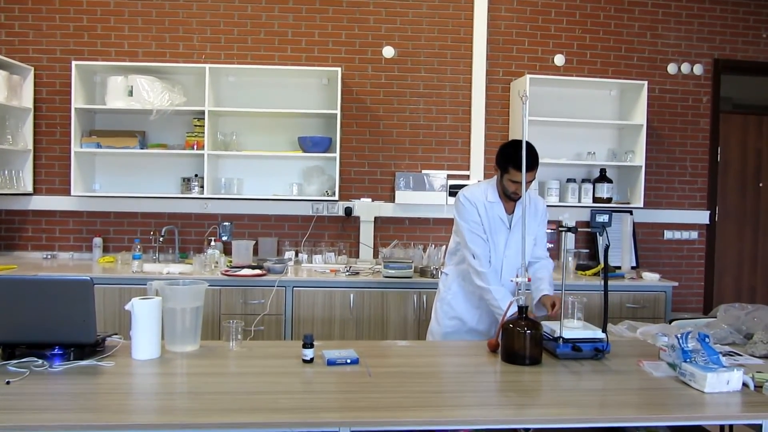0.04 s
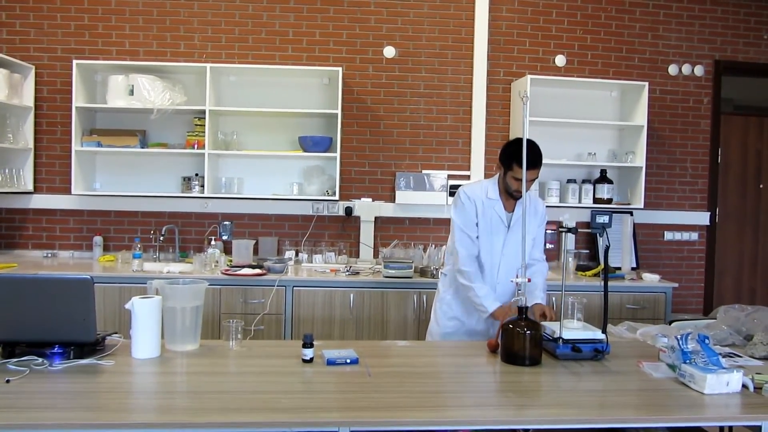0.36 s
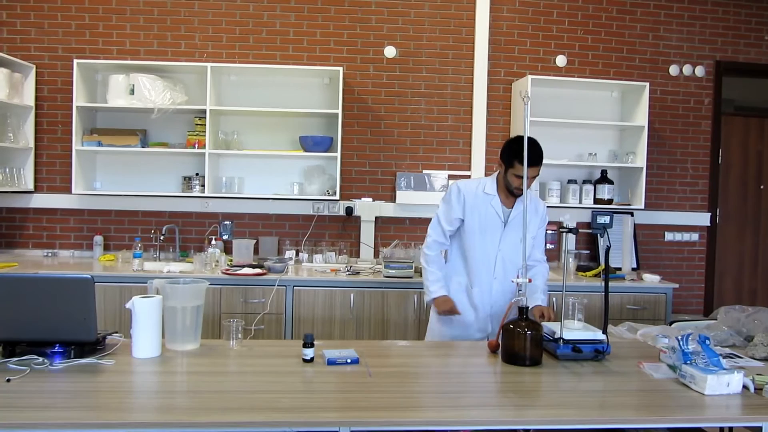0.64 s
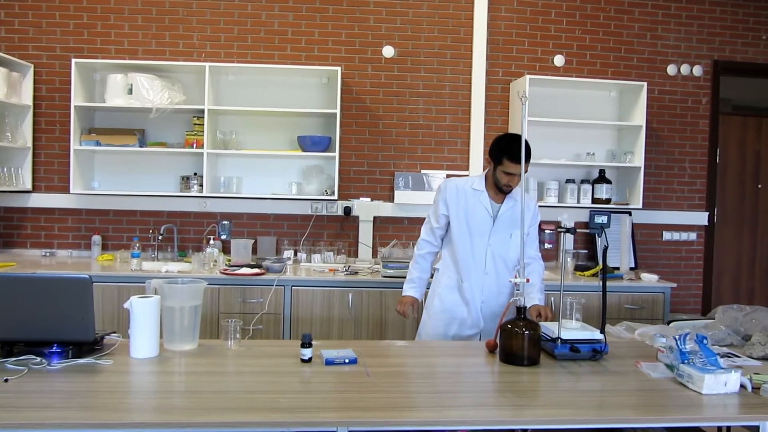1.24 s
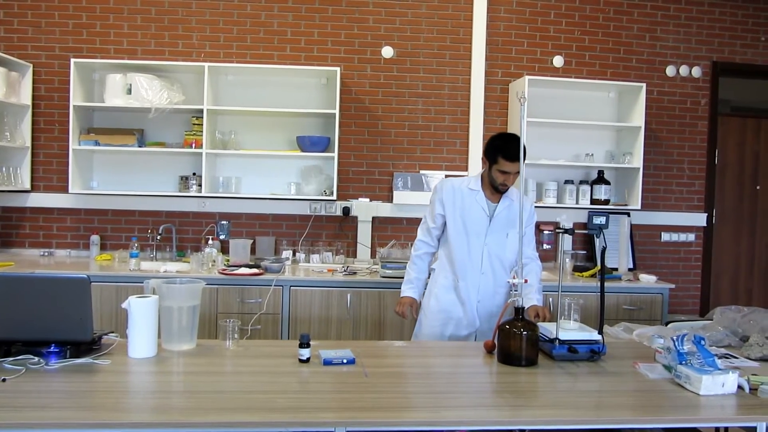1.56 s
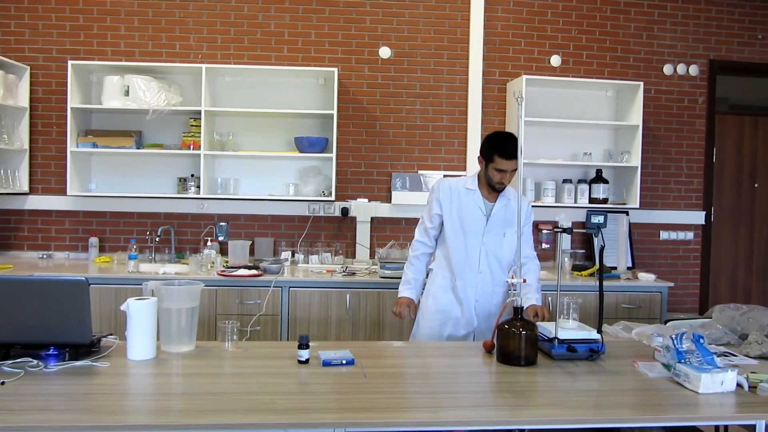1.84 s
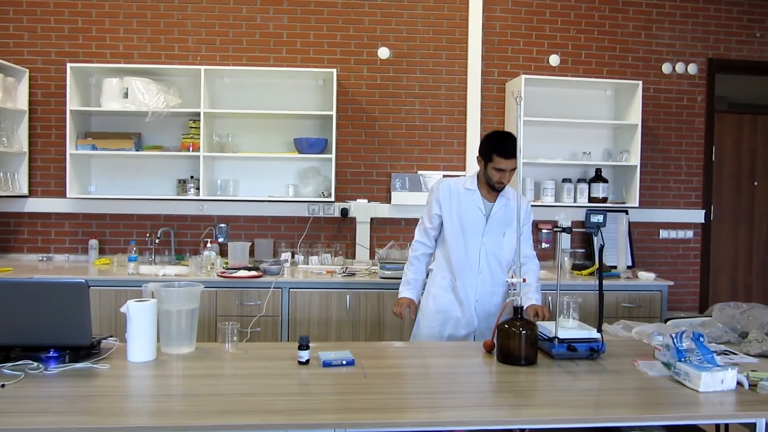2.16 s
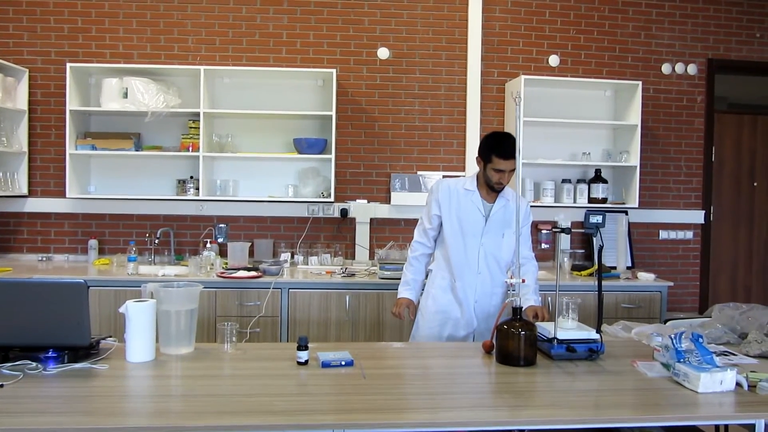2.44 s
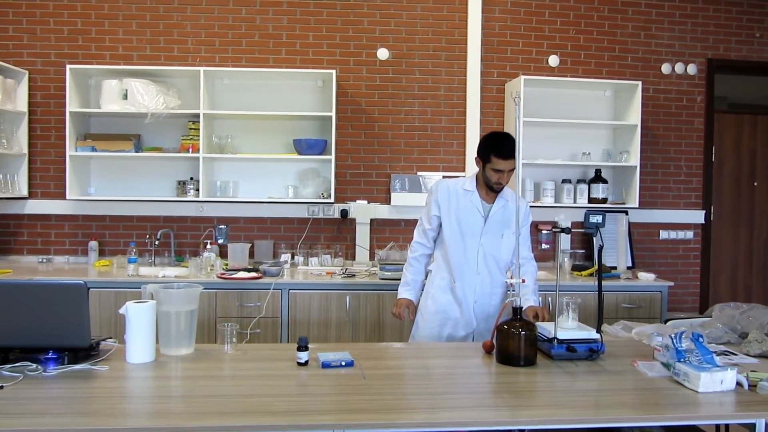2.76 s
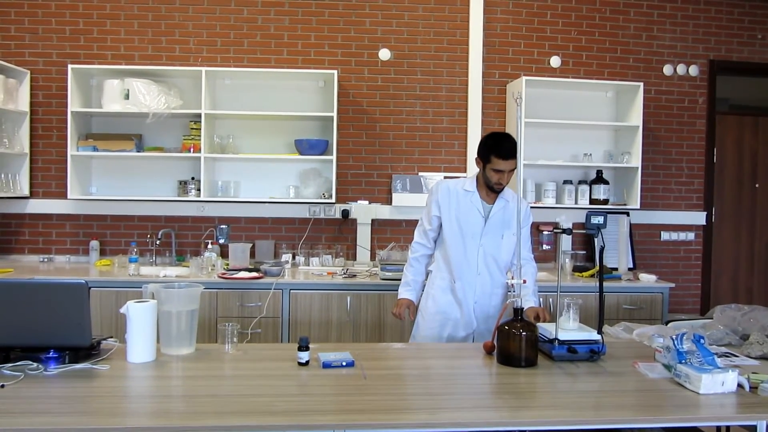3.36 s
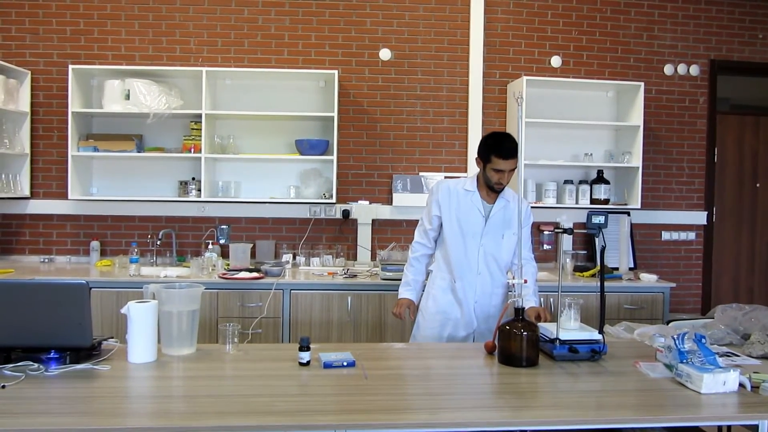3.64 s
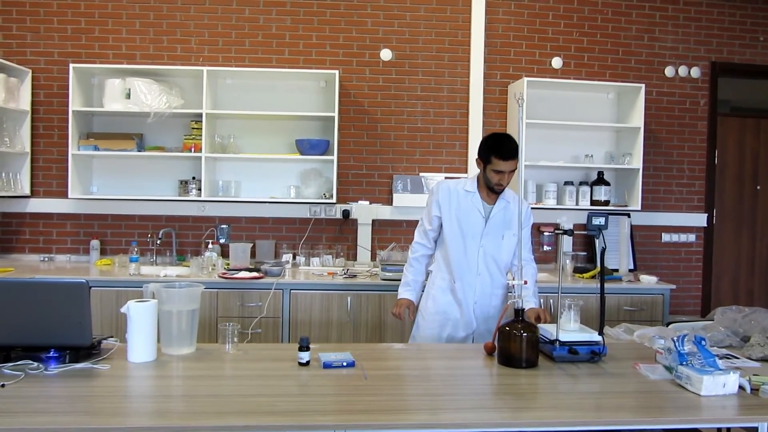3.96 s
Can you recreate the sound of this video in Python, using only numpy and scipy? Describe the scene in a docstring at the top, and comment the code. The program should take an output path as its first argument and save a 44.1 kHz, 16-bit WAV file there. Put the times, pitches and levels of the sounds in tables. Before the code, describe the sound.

A lab stirrer's bar speeds up, rattling and clinking unevenly against glass as its motor hums.

```python
"""Magnetic stirrer in a laboratory

The motor hums while the bar speeds up and rattles in a glass vessel. Uneven taps ring the vessel and
its plate; a bright resonance climbs and takes over as the stirring grows. Now and then the bar kicks
or scrapes against the glass. A hard-walled room answers over faint ventilation hiss."""
import sys
import numpy as np
from scipy import signal
from scipy.fft import rfft, irfft, next_fast_len
from scipy.io import wavfile
from scipy.ndimage import uniform_filter1d, map_coordinates

SR = 44100
rng = np.random.default_rng(int(sys.argv[2]) if len(sys.argv) > 2 else 0)


def unload_audio(sound):
    """Save the sound as a 16-bit wav file, at the path given as the first command line argument."""
    columns = np.transpose(np.atleast_2d(sound))
    # keep every value between -1 and 1, then stretch to whole-number steps
    steps = np.round(np.clip(columns, -1, 1) * 32767)
    wavfile.write(sys.argv[1], SR, steps.astype(np.int16))


N = 4 * SR
SKIRT_HZ, PING_RISE_S = 850, .00046

# spectrum of sharp contact with the glass: f/Hz, level/dB
GLASS_SPECTRUM = [(40, -47), (100, -36.5), (900, -8.5), (1500, -2), (2400, -1.5), (2900, 2.5), (3300, 2.5),
                  (3750, -5), (4100, -13), (4800, -10), (5250, -5), (5650, -14.5), (6200, -11.5),
                  (7000, -18), (7800, -26), (8800, -28.5), (10000, -41), (12000, -64.5), (14000, -51.5),
                  (16000, -64.5)]


def amp(db):
    """Decibels to gain."""
    return 10 ** (np.asarray(db) / 20)


def unit(x):
    """Scale to rms 1."""
    return x / np.sqrt(np.mean(x ** 2) + 1e-20)


def along(points, hz):
    """Interpolate (f/Hz, value) points on a log axis."""
    f, v = np.transpose(points)
    return np.interp(np.log(hz + 1), np.log(f + 1), v)


def curves(rows):
    """One value per sample for each column after t/s."""
    s, *cols = np.transpose(rows)
    return [np.interp(np.arange(N) / SR, s, c) for c in cols]


def wobble(knots_per_s):
    """Smooth random curve."""
    return map_coordinates(rng.standard_normal(400), [np.arange(N) * knots_per_s / SR], mode='mirror')


def envelope(t, rise_s, t60_s):
    """Exponential rise and decay."""
    return (1 - np.exp(-t / rise_s)) * amp(-60 * t / t60_s)


def add(track, start_s, sound):
    """Mix a sound into the track."""
    part = track[round(start_s * SR):][:len(sound)]
    part += sound[:len(part)]


def filtered(x, response, pad=4096):
    """Apply a frequency response; ends mirrored and faded."""
    edge = np.hanning(2 * pad)
    length = x.shape[-1]
    x = np.pad(x, [(0, 0)] * (x.ndim - 1) + [(pad, pad)], mode='reflect')
    x = x * np.concatenate([edge[:pad], np.ones(length), edge[pad:]])
    m = next_fast_len(length + 4 * pad)
    return irfft(rfft(x, m) * response(np.fft.rfftfreq(m, 1 / SR)), m)[..., pad:pad + length]


def struck(force, spectrum, size=8192):
    """Ring a minimum-phase body of given spectrum and unit energy."""
    cepstrum = irfft(np.log(amp(along(spectrum, np.fft.rfftfreq(size, 1 / SR)))))
    cepstrum[1:size // 2] *= 2
    cepstrum[size // 2 + 1:] = 0
    impulse = irfft(np.exp(rfft(cepstrum)))
    return signal.fftconvolve(force, impulse / np.linalg.norm(impulse))[:N]


def resonance(force, hz, widths_hz):
    """Unit-energy resonance with a per-sample centre, one pole per width."""
    turn = np.exp(2j * np.pi * np.cumsum(hz) / SR)
    poles = np.poly(np.exp(-np.pi * np.abs(widths_hz) / SR))
    impulse = signal.lfilter([1], poles, signal.unit_impulse(SR // 10))
    return np.sqrt(2) * np.real(turn * signal.lfilter([1], poles, force / turn)) / np.linalg.norm(impulse)


def diffuse_noise(size):
    """Noise of a diffuse field, left and right."""
    # left-right likeness: f/Hz, correlation
    likeness = [(100, 0), (700, 0.2), (1500, 0.53), (2500, 0), (10000, 0)]
    angle = lambda hz: np.arccos(np.clip(along(likeness, hz), -1, 1)) / 2
    noise = rng.standard_normal((2, size))
    mid, side = filtered(noise, lambda hz: np.array([np.cos(angle(hz)), np.sin(angle(hz))]))
    return np.array([mid + side, mid - side])


def ventilation(rms_db=-46.5):
    """Steady air noise of the room."""
    # noise spectrum: f/Hz, relative level/dB
    spectrum = [(20, -11), (45, -9.5), (75, 0.5), (130, -0.5), (260, -0.5), (420, -8.5), (1000, -11.5),
                (2500, -15), (4000, -26.5), (6500, -23.5), (10000, -39), (12000, -52), (16000, -56)]
    return amp(rms_db) * unit(filtered(diffuse_noise(N), lambda hz: amp(along(spectrum, hz))))


def echoes(x, bench_db=-2, bench_t60_s=.068):
    """Quick bench reflections and the room's tail along one set of paths."""
    # room decay: f/Hz, T60/s
    room_t60 = [(150, 0.47), (800, 0.75), (2500, 0.66), (10000, 0.75)]
    hz, t, bands = signal.stft(diffuse_noise(SR // 2), SR, nperseg=256)
    decay = amp(-60 * t / along(room_t60, hz)[:, None]) + amp(bench_db - 60 * t / bench_t60_s)
    bands = bands * decay * (t > 0)
    tail = signal.istft(bands / np.linalg.norm(bands, axis=2, keepdims=True), SR, nperseg=256)[1]
    return signal.fftconvolve(x[None], tail / np.linalg.norm(tail[0]), axes=1)[:, :N]


def laboratory(x, room_db=0, right_lead_s=2e-5):
    """Stereo direct sound and echoes; paths shift as the contact point moves round the vessel."""
    # room over direct: f/Hz, level/dB
    room_ratio = [(150, -3.5), (800, 2.5), (1500, 2.5), (2400, 5), (3400, 3), (5000, 7.5), (10000, 3)]
    # right over left: f/Hz, level/dB
    balance = [(100, 2.5), (800, 0.2), (1200, 0.5), (2200, 1.5), (3400, 3), (4300, 1.5), (6200, 2.5),
               (8000, 0)]
    wander_rad = .3 * wobble(5.02)
    wet = echoes(x * np.cos(wander_rad)) + echoes(x * np.sin(wander_rad))
    wet_gain = lambda hz: amp(room_db + along(room_ratio, hz))
    sides = np.array([[-.5], [.5]])
    direct = filtered(x, lambda hz: np.exp(2j * np.pi * hz * right_lead_s * sides))
    both = direct + filtered(wet, wet_gain)
    return filtered(both, lambda hz: amp(sides * along(balance, hz)) / np.hypot(1, wet_gain(hz)))


def motor(hum_hz=100.8, waver_db=1.5):
    """Mains hum, wavering in level."""
    # hum amplitude: t/s, level/dB
    level = [(0, -47.5), (.8, -47), (2, -46), (3.3, -52.5), (4, -48.5)]
    t = np.arange(N) / SR
    phase_rad = np.array([[0], [1]])  # left, right
    return amp(curves(level)[0] + waver_db * wobble(11)) * np.sin(2 * np.pi * hum_hz * t + phase_rad)


def plate(force, gain_db=-3.5, widths_hz=(8, 150)):
    """Plate, bench and vessel hold a few lasting notes."""
    # long-ringing modes: f/Hz, level/dB
    modes = [(167, -20), (220, -24.5), (548, -21.5), (712, -9), (735, -5), (788, -18.5), (838, -5.5),
             (872, -12), (1072, -14), (1304, -12.5)]
    notes = sum(amp(gain_db + db) * resonance(force, np.full(N, hz), widths_hz) for hz, db in modes)
    return signal.sosfilt(signal.butter(2, 110, 'high', fs=SR, output='sos'), notes)


def brushes(rise_s=.0035):
    """Faint brushing: bursts of bright noise."""
    # bursts: t/s, T60/s, level/dB
    bursts = [(1.223, 0.087, -48), (1.731, 0.21, -41), (2.056, 0.06, -42), (2.793, 0.13, -35.5)]
    # brushing spectrum: f/Hz, level/dB
    spectrum = [(1500, -21), (4000, -9.5), (6500, 0), (9000, -7.5), (11000, -23), (16000, -35)]
    t, track = np.arange(SR // 2) / SR, np.zeros(N)
    for s, t60_s, db in bursts:
        add(track, s, amp(db) * envelope(t, rise_s, t60_s) * rng.standard_normal(len(t)))
    return struck(track, spectrum)


def pings(t60_s=.019):
    """Light pings of glass, one damped sine each."""
    # pings: t/s, f/Hz, level/dB
    notes = [(.772, 6370, -37), (1.033, 6290, -36), (1.108, 3450, -32), (1.505, 3060, -20),
             (1.629, 6180, -31.5)]
    t, track = np.arange(SR // 2) / SR, np.zeros(N)
    for s, hz, db in notes:
        add(track, s, amp(db) * envelope(t, PING_RISE_S, t60_s) * np.sin(2 * np.pi * hz * t))
    return track


def chinks(per_s=70, centre_hz=3058, spread_db=4.5, t60_s=.06):
    """Brief glassy notes, scattered in time, pitch and level; rms 1."""
    t, track = np.arange(SR // 20) / SR, np.zeros(N)
    for k, (late, pitch, loud) in enumerate(rng.standard_normal((700, 3))):
        hz = centre_hz * np.exp(.066 * pitch)
        note = np.sin(2 * np.pi * hz * t) * envelope(t, PING_RISE_S, t60_s)
        add(track, abs(k + late) / per_s, note * amp(spread_db * loud))
    return unit(track)


def rim(force, chatter_db=3.5):
    """The vessel's thin rings chatter and waver in pitch."""
    # thin modes: f/Hz, width/Hz, level/dB
    modes = [(2830, 47, -1), (5240, 170, -19.5), (6290, 350, -24.5)]
    # drive of these modes: t/s, level/dB
    level = [(0, -63), (.55, -53), (1.47, -49.5), (1.51, -41), (1.56, -41.5), (1.62, -34.5), (1.69, -54),
             (1.79, -52), (1.805, -24), (1.86, -46), (1.9, -34), (2.1, -34), (2.2, -45), (2.6, -42.5),
             (4, -43)]
    bend = 1 + .01 * wobble(16)
    drive = force * amp(curves(level)[0] + chatter_db * wobble(35))
    return sum(amp(db) * resonance(drive, hz * bend, [width_hz, SKIRT_HZ]) for hz, width_hz, db in modes)


def scrapes(force, rise_s=.0027, t60_s=.033):
    """The sliding bar rings a glassy resonance that glides, mostly downward."""
    # slides: t/s, length/s, first f/Hz, last f/Hz, level/dB
    slides = [(2.285, 0.079, 3270, 2990, -27.5), (2.446, 0.082, 2990, 2760, -25),
              (2.526, 0.15, 3500, 3290, -31), (2.934, 0.028, 3060, 2930, -24),
              (3.289, 0.021, 3520, 3360, -25.5), (3.326, 0.014, 3410, 3370, -25.5),
              (3.435, 0.0094, 3270, 3070, -22), (3.654, 0.027, 3460, 3300, -31),
              (3.893, 0.086, 3460, 3540, -34)]
    track = np.zeros(N)
    for s, length_s, first_hz, last_hz, db in slides:
        rub = force[round(s * SR):][:SR // 4]
        t = np.arange(len(rub)) / SR
        hz = np.interp(t, [0, length_s], [first_hz, last_hz])
        note = unit(resonance(rub, hz, widths_hz=[200, 600]))
        release_db = -60 * np.maximum(t - length_s, 0) / t60_s
        add(track, s, note * (1 - np.exp(-t / rise_s)) * amp(db + release_db))
    return track


def kicks(equivalent_s=.011, tip_db=-2):
    """Hard blows with a short skid, each with the energy of equivalent_s of rattle: two forces."""
    # kicks: t/s, ring level/dB, treble level/dB
    blows = [(0.452, -52, -66), (.535, -39, -67), (1.507, -31.5, -36), (1.799, -19, -59), (1.808, -16, -60),
             (1.892, -20, -38), (2.046, -36, -30.5), (2.072, -18.5, -21.5), (2.293, -19.5, -23.5),
             (2.302, -18, -42), (2.378, -26, -21.5), (2.463, -20, -38), (2.538, -15, -20.5),
             (2.672, -14.5, -25.5), (2.679, -17.5, -31), (2.867, -16, -28.5), (2.941, -19.5, -28.5),
             (2.975, -18.5, -29), (3.0, -21.5, -25), (3.055, -18, -25), (3.16, -16, -22.5),
             (3.291, -17, -22), (3.301, -22.5, -25.5), (3.331, -16.5, -25), (3.442, -17, -22),
             (3.45, -15, -25), (3.46, -16, -25), (3.483, -14.5, -27.5), (3.657, -18.5, -23.5),
             (3.729, -24.5, -27), (3.765, -18.5, -21.5), (3.786, -21, -23.5), (3.878, -18, -19.5),
             (3.886, -23, -29), (3.91, -16.5, -24), (3.92, -21, -24.5), (3.955, -19.5, -25.5)]
    t, ring, treble = np.arange(2048) / SR, np.zeros(N), np.zeros(N)
    scale = np.sqrt(equivalent_s * SR / len(t))
    tip = amp(tip_db) * unit(t == 0)
    for s, ring_db, treble_db in blows:
        grit = rng.standard_normal(len(t))
        ring_skid = unit(grit * envelope(t, rise_s=.0008, t60_s=.025))
        glass_skid = unit(grit * envelope(t, rise_s=.0017, t60_s=.067))
        add(ring, s, scale * amp(ring_db) * unit(ring_skid + tip))
        add(treble, s, scale * amp(treble_db) * glass_skid)
    return ring, treble


def knocks(blows, sharp_blows):
    """Kicks sound a dull clack and the bright glass."""
    # clack spectrum: f/Hz, level/dB
    clack = [(50, -45), (200, -30), (700, -15.5), (1300, 0), (2200, 1), (2850, -2.5), (3300, -0.5),
             (3650, -14), (4100, -20.5), (8000, -45.5), (16000, -65)]
    return struck(blows * amp(-10.5), clack) + struck(sharp_blows * amp(-3), GLASS_SPECTRUM)


def taps(per_s=150, scatter=.4, spread_db=3):
    """Uneven taps of the bar, levelled to a steady power."""
    late, loud = rng.standard_normal((1600, 2)).T
    at = np.round((np.arange(len(late)) + scatter * late) * SR / per_s).astype(int)
    inside = (at >= 0) & (at < N)
    force = unit(np.bincount(at[inside], amp(spread_db * loud[inside]), N))
    power = uniform_filter1d(uniform_filter1d(force ** 2, size=2200), size=2200)
    return (force - force.mean()) / np.sqrt(np.abs(power) + 1e-9)


def sliding(tapping, noise_db):
    """Taps with sliding noise between them; rms 1."""
    return unit(tapping + amp(noise_db) * rng.standard_normal(N))


def climbing_ring(force, light_force, width_hz=190, halo_width_hz=390):
    """Bright resonance that climbs with the stirring; light taps ring it only broadly."""
    # resonance centre: t/s, f/Hz
    climb = [(0, 1580), (.95, 1564), (1.35, 1930), (1.62, 2120), (1.81, 2210), (2.03, 2100), (2.09, 2275),
             (2.25, 2140), (2.45, 2170), (2.56, 2274), (2.68, 2343), (2.9, 2268), (3.1, 2360), (3.5, 2380),
             (4, 2410)]
    hz = curves(climb)[0]
    halo = resonance(light_force, hz, [halo_width_hz, halo_width_hz])
    return resonance(force, hz, [width_hz, SKIRT_HZ]) + halo


def stir_bar(blows, sharp_blows, throb_db=1.6):
    """Taps and kicks ring the vessel; returns rattle, knocks and the force on the plate."""
    # rattle force: t/s, low level/dB, climbing ring level/dB, treble level/dB
    levels = [(0, -48, -64, -60), (.33, -45.5, -64, -90), (.55, -37, -52, -59), (.68, -40.5, -44, -54),
              (.88, -41.5, -64, -63), (1.06, -37, -48, -68), (1.45, -35, -46.5, -51),
              (1.61, -28, -35.5, -46.5), (1.72, -32, -43.5, -44), (1.79, -29, -40.5, -46),
              (1.82, -30.5, -34.5, -43), (2.02, -28, -27, -39), (2.14, -24.5, -23, -38),
              (2.27, -34.5, -30.5, -40), (2.36, -25, -27.5, -32.5), (2.5, -26, -23.5, -35),
              (2.58, -26, -21.5, -32.5), (2.77, -29.5, -22.5, -33), (2.84, -24, -20, -29),
              (2.97, -25.5, -20, -29), (3.17, -27.5, -25, -29), (3.28, -28.5, -28, -35.5),
              (3.34, -28.5, -20, -37), (3.43, -30.5, -25, -31.5), (3.48, -26.5, -26, -32.5),
              (3.56, -29.5, -24.5, -32.5), (3.78, -27, -21.5, -32.5), (3.91, -25.5, -20.5, -29.5),
              (4, -30, -19, -27)]
    # spectrum of vessel and plate: f/Hz, level/dB
    body_spectrum = [(30, -39), (120, -45), (170, -34.5), (200, -16.5), (270, -14), (330, -16.5),
                     (410, -20), (520, -19.5), (645, -8.5), (715, -1.5), (780, 1.5), (850, -2),
                     (915, -27.5), (980, -16.5), (1080, -10), (1200, -8.5), (1310, -11.5), (1420, -15.5),
                     (1580, -8), (1900, -19.5), (2600, -26), (4000, -54.5), (9000, -44), (16000, -87)]
    low_db, ring_db, treble_db = curves(levels)
    tapping = taps()
    force = sliding(tapping, noise_db=-3)
    low_force = force * amp(low_db + throb_db * wobble(22))  # throbs as the bar tumbles
    body = struck(low_force * amp(-1) + blows * amp(-10), body_spectrum)
    glass = struck(sliding(tapping, noise_db=2.5) * amp(treble_db + 1), GLASS_SPECTRUM)
    ring = climbing_ring(force * amp(ring_db + .5) + blows * amp(-.5), low_force * amp(-12.5))
    bright = ring + chinks() * amp(treble_db - 6.5) + rim(force) + scrapes(force)
    bright = signal.sosfilt(signal.butter(2, [600, 7000], 'band', fs=SR, output='sos'), bright)
    return body + glass + bright, knocks(blows, sharp_blows), low_force


def scene():
    """The stirrer in its room; hard knocks arrive more directly."""
    rattle, knocking, plate_force = stir_bar(*kicks())
    stirring = laboratory(rattle + pings() + brushes()) + laboratory(knocking, room_db=-6)
    return stirring + plate(plate_force) + motor() + ventilation()


def record(dry, top_hz=15720):
    """Steep low-pass band limit."""
    return signal.sosfilt(signal.ellip(12, .1, 90, top_hz, fs=SR, output='sos'), dry)


dry = scene()
out = record(dry)
unload_audio(out)
```